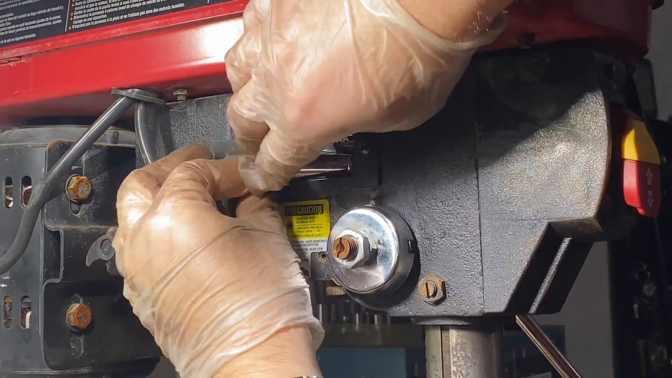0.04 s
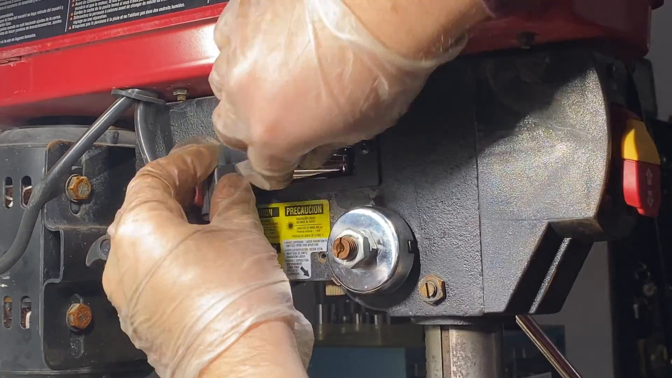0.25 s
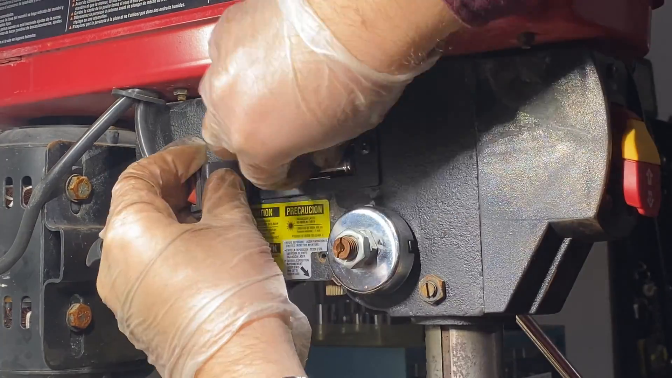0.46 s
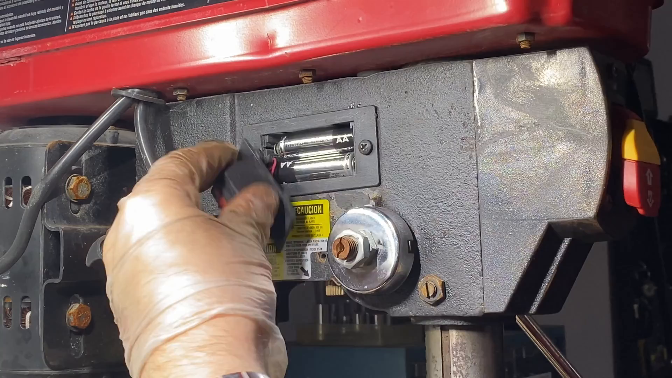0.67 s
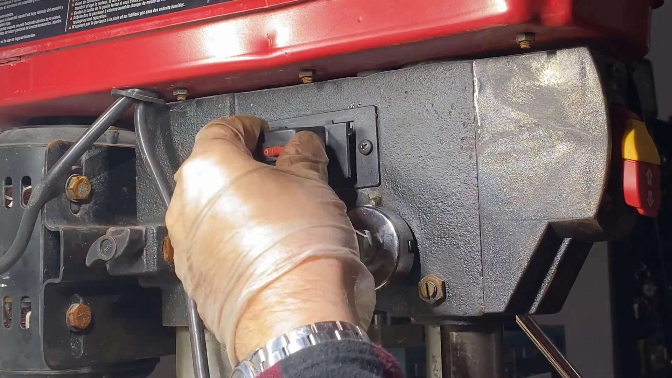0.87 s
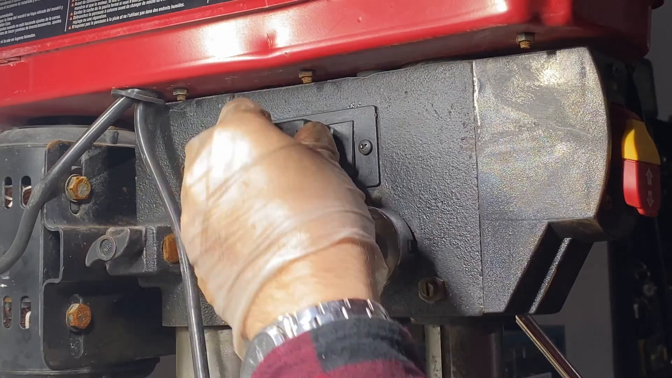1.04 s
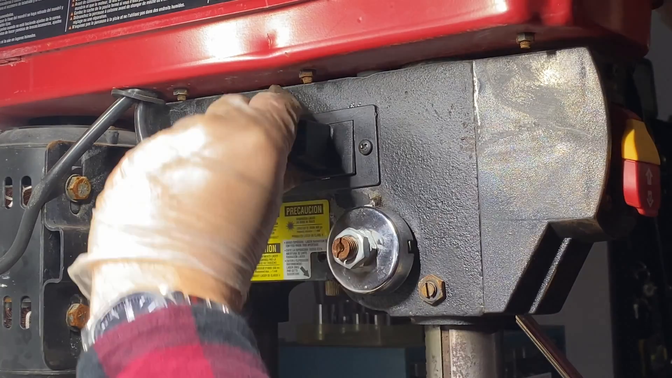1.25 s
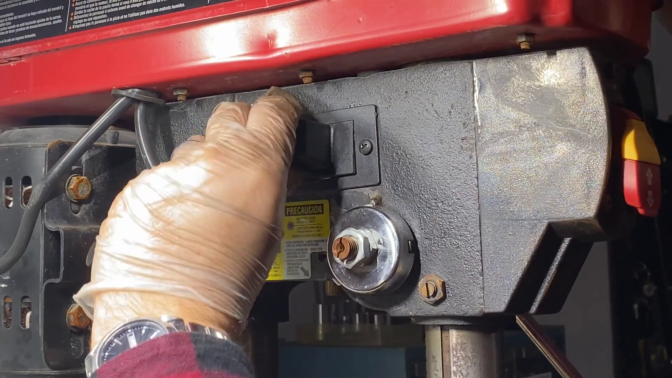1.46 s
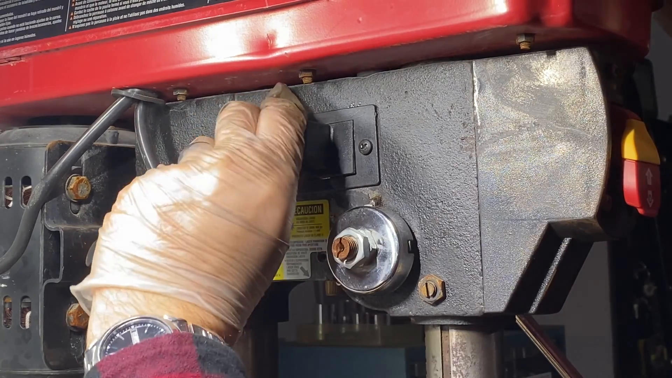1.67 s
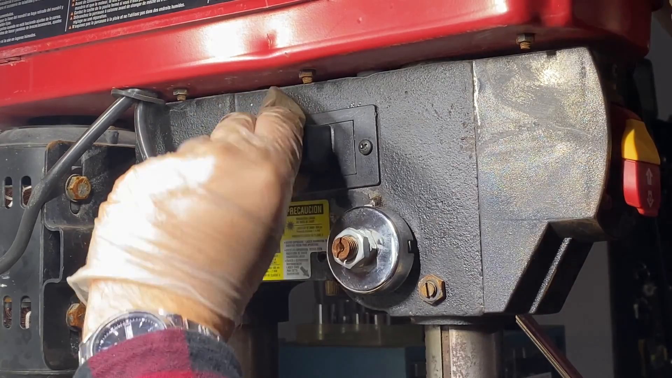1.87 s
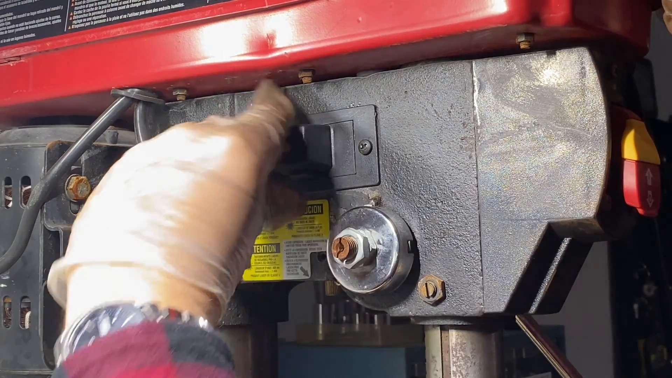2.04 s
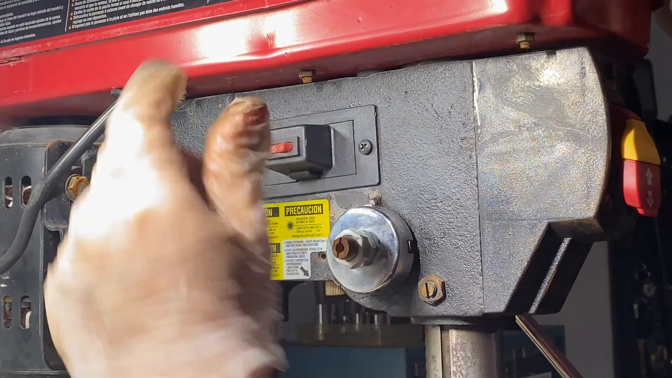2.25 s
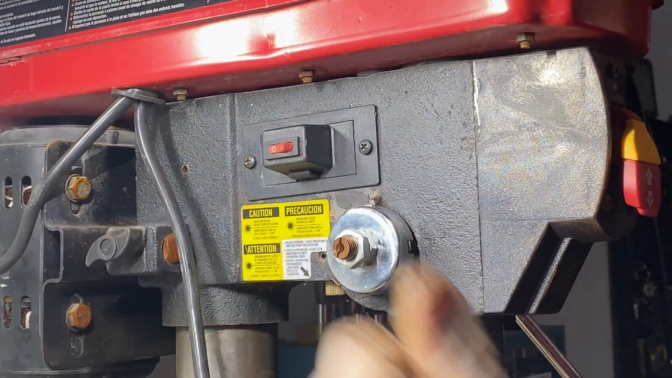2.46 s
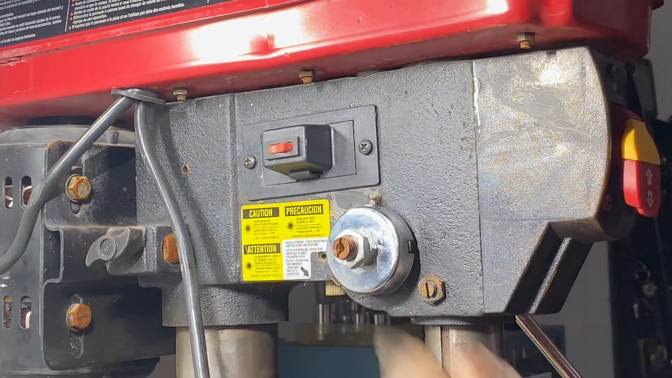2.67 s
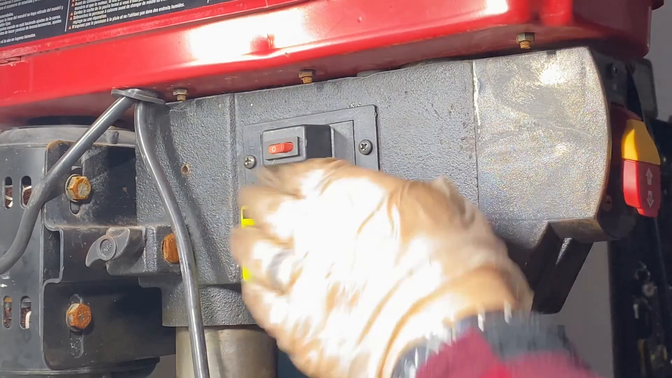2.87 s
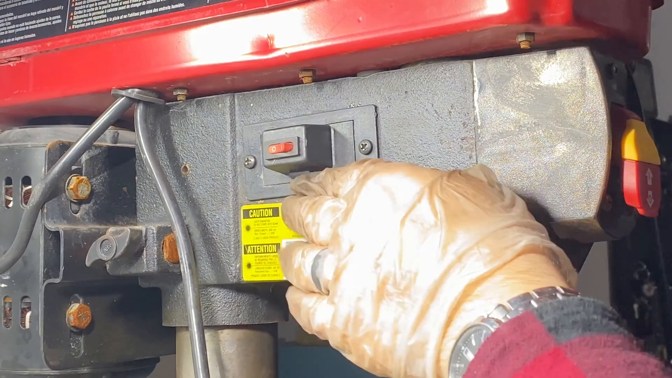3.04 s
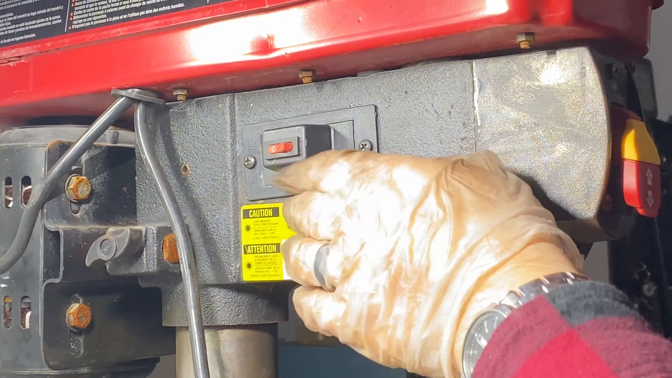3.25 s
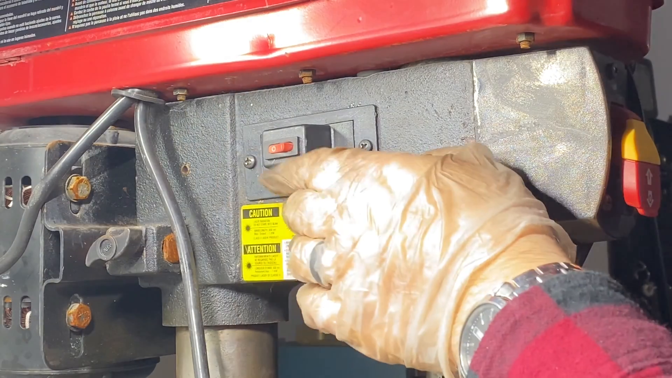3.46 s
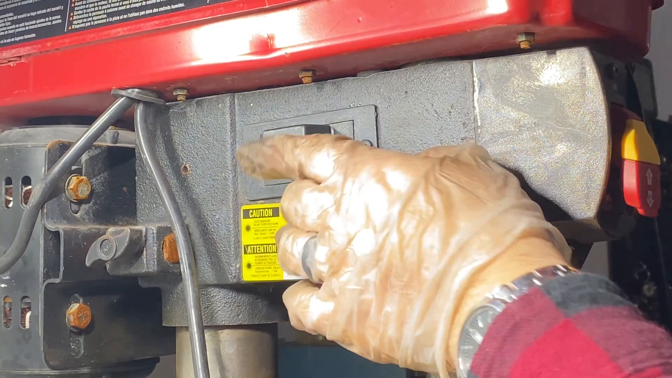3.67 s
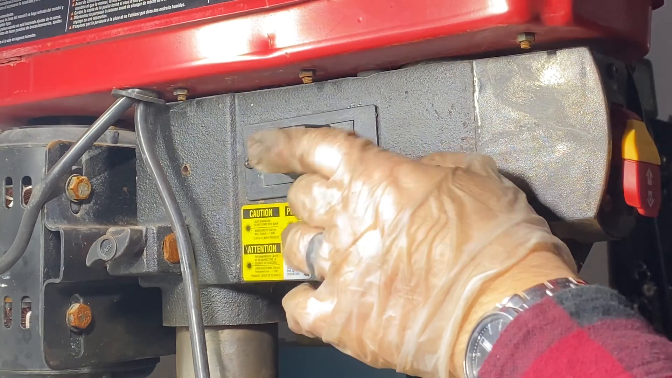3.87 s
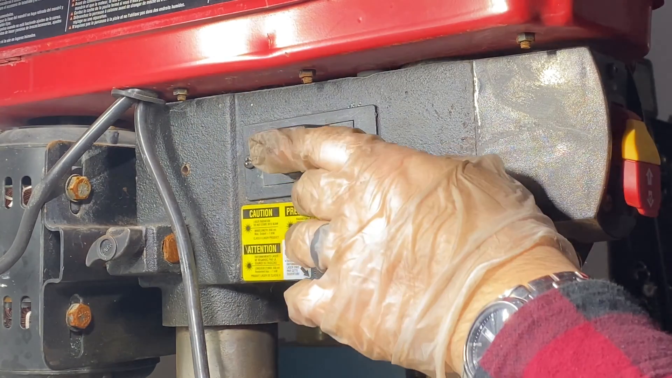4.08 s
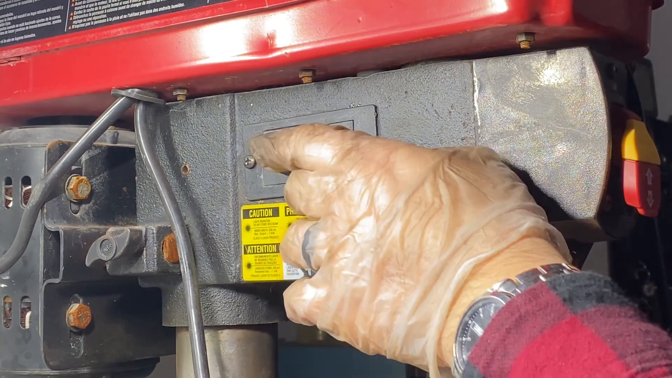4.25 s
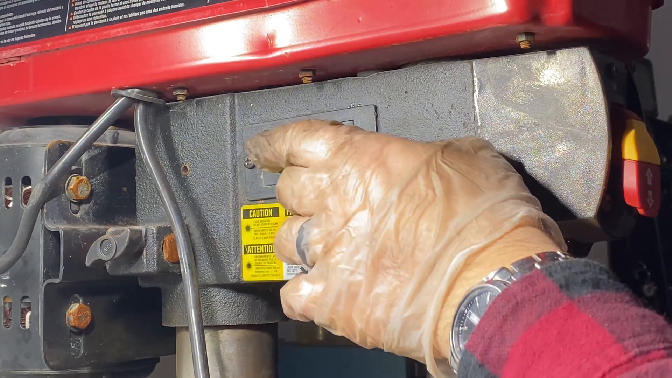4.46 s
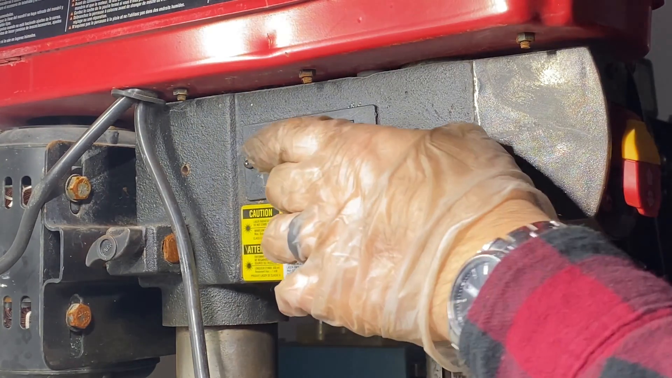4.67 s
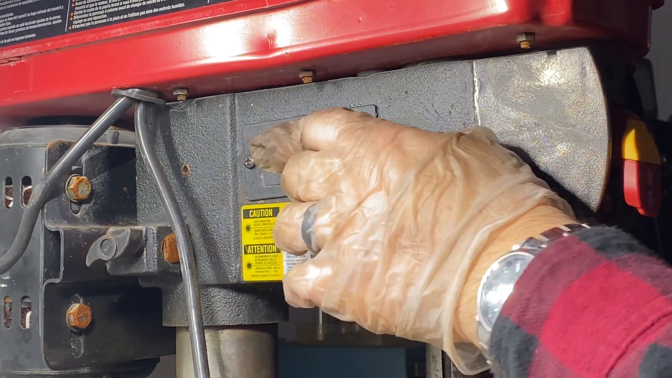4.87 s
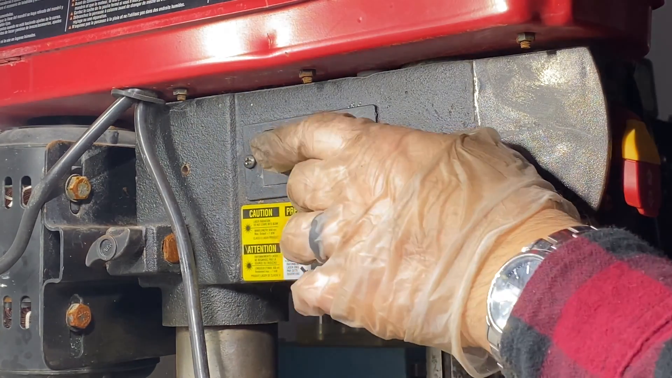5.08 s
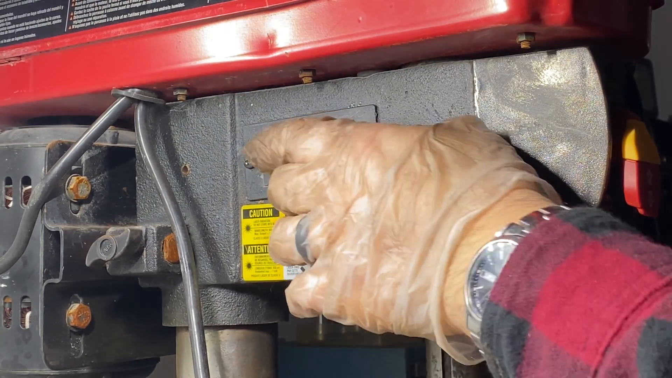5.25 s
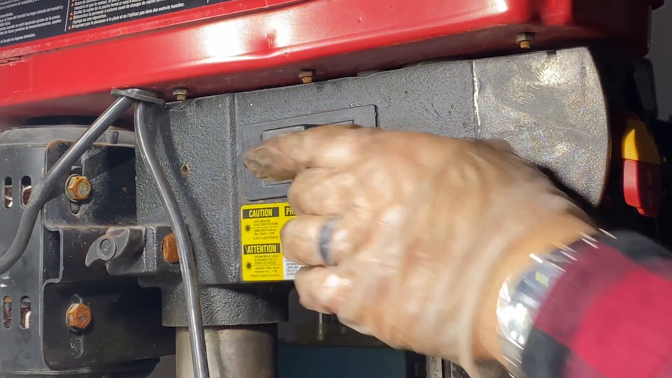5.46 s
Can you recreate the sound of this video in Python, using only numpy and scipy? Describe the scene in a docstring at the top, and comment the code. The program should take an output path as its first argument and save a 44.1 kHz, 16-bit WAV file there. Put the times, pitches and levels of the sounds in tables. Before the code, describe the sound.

Close plastic knocks and one hard snap as a cover closes on a machine, followed by glove crinkles and two crisp switch clicks.

```python
"""Gloved hands, close to two microphone ports, seat batteries in a plastic bay, snap its cover and work a switch.
Each knock or snap is a contact with brief chatter that rings the plastic or switch, and the cast iron behind.
Scrapes rub noise into the bay's modes, the cover settles with falling thunks and the thin gloves crinkle in grains.
Farther off, the workshop answers with decaying noise and rumbles faintly, with hiss, whistling bands and a whine."""
import sys
import numpy as np
from scipy import signal
from scipy.fft import rfft, irfft, next_fast_len
from scipy.io import wavfile

SR = 44100
rng = np.random.default_rng(int(sys.argv[2]) if len(sys.argv) > 2 else 0)


def transcribe(u):
    """Save the signal u as a 16-bit wav file named by the first command-line argument.

    u: samples, shape (n,) or (channels, n), limited to [-1, 1]; the rate is SR.
    q: integer samples, one column per channel.
    """
    v = np.clip(np.atleast_2d(u).T, -1, 1)
    q = np.round(v * 32767).astype(np.int16)
    wavfile.write(sys.argv[1], SR, q)


N = 243383

# Workshop rumble and air. Each row: frequency in Hz, relative density in dB per Hz.
AIR_COLOUR = [(12, -59), (20, -40.5), (45, -3.5), (86, 3.5), (142, -16.5), (241, -10.5), (319, -36.5),
              (377, -27.5), (949, -38.5), (1710, -40), (2080, -61.5), (2820, -64), (16000, -82)]
# Level of that air. Each row: time in seconds, level in dB.
AIR_LEVEL = [(0, -53.5), (1.7, -50.5), (2.1, -53), (2.95, -50.5), (3.4, -52.5), (4.75, -50.5),
             (5.52, -50.5)]
# Left-right likeness of the air. Each row: frequency in Hz, likeness from 0 to 1.
AIR_LIKENESS = [(30, 0.96), (100, 0.96), (300, 0.54), (1000, 0.43), (3000, 1), (10000, 0.83)]
# Faint whistling bands in the air. Each row: centre in Hz, width in Hz, level in dB.
WHISTLES = [(1920, 590, -90), (2750, 200, -87.5)]
# Decay of the walls' answer. Each row: frequency in Hz, time to fall 60 dB in seconds.
WALL_DECAY = [(200, 1), (530, 0.87), (1390, 0.48), (3680, 0.57), (9700, 0.43)]
# Left-right likeness of the room's answer. Each row: frequency in Hz, likeness from 0 to 1.
WALL_LIKENESS = [(250, 0.94), (640, 0.5), (1400, 0.22), (3000, 0.97), (7000, 0.77)]
# Hands and sleeves stirring close by. Each row: time in seconds, level in dB.
STIRRING = [(0, -90), (.62, -89.5), (.8, -77), (1.45, -75), (1.91, -70.5), (2.1, -77), (2.7, -75),
            (3.17, -82.5), (3.4, -77), (3.98, -87), (4.9, -89.5), (5.4, -78), (5.52, -87)]
# Colour of the glove film. Each row: frequency in Hz, relative density in dB per Hz.
FILM_COLOUR = [(410, -57.5), (700, -2), (2080, -5), (2300, -1), (2730, -2), (7200, -9), (8650, -8.5),
               (10700, -17), (13500, -8.5), (16000, -16)]
# Glove brushing and crinkling.
# Each row: peak time in seconds, level in dB, rise in seconds, fall in seconds, treble over body in dB.
GLOVE_BRUSHES = [(.81, -76, .0092, 0.0059, 0), (1.102, -62, 0.026, 0.019, 2.5), (1.28, -64.5, .02, .02, 6),
                 (2.032, -69, 0.022, .01, -2), (2.129, -55.5, 0.034, 0.0063, 4),
                 (2.281, -69, 0.044, 0.094, 17), (2.41, -67, 0.022, 0.03, 9),
                 (2.49, -74, 0.032, 0.014, -13), (2.67, -67, 0.045, 0.052, 27),
                 (2.776, -68.5, 0.0073, .005, 20), (2.936, -55, 0.0077, 0.016, -0.5),
                 (3.13, -60.5, 0.012, .005, 1), (3.263, -57, 0.0098, .03, -0.5),
                 (3.378, -52.5, 0.01, 0.0035, -0.5), (3.46, -65.5, .017, 0.031, -3),
                 (3.511, -56.5, .01, 0.017, 6), (3.562, -60.5, 0.00084, .0063, 1),
                 (3.713, -68, 0.014, 0.015, -5.5), (4.30, -79, .012, .03, -7.5),
                 (4.869, -59.5, .006, 0.019, -2.5), (5.09, -69, 0.0051, 0.0063, -2),
                 (5.401, -71.5, .0036, .03, 10), (5.451, -70.5, .018, 0.023, 12)]
# Fingers and batteries scraping in the bay.
# Each row: peak time in seconds, level in dB, rise in seconds, fall in seconds.
BAY_SCRAPES = [(0.446, -60, 0.0084, 0.016), (.555, -79, 0.0075, .02), (0.601, -62.5, 0.013, 0.035),
               (.64, -64.5, .01, 0.061), (1.475, -60, 0.0059, 0.0074)]
# The cover settling after a knock.
# Each row: start in seconds, level in dB, start pitch in Hz, end pitch in Hz, length in seconds.
COVER_THUNKS = [(0.691, -54, 700, 422, 0.0453), (1.589, -47.5, 851, 372.5, 0.05)]
# Modes of the cover and bay. Each row: frequency in Hz, relative level in dB, time to fall 60 dB in seconds.
COVER_MODES = [(400.3, -27, 0.15), (444, -10.5, 0.0052), (735, -1.5, 0.011), (1100, -4.5, 0.0074),
               (1432, 1, 0.008), (2187, 0, 0.011), (2730, -1.5, 0.0055), (3550, -0.5, 0.0068),
               (4240, -2, 0.0035), (7100, 4, 0.0013)]
# Modes of the switch rocker and spring. Each row: frequency in Hz, relative level in dB, 60 dB fall in seconds.
SWITCH_MODES = [(700, -5, 0.0073), (1080, -7, 0.012), (1350, -3.5, 0.0076), (1976, 0.5, 0.012),
                (2887, 7.5, 0.013), (4200, -2.5, 0.0046), (6820, -1, 0.049), (10230, -17, 0.0028)]
# Modes of the iron casting and sheet hood. Each row: frequency in Hz, relative level in dB, 60 dB fall in seconds.
CASTING_MODES = [(138, -3.5, 0.045), (182, -5, 0.11), (256.3, -7.5, 0.36), (487, -3.5, 0.18),
                 (608, -11.5, 0.15), (695.6, 0.5, 0.13), (1347, -25, 0.3), (2050, -30, 0.25)]
# Knocks on the plastic cover. Each row: start in seconds, level in dB, contact time constant in ms,
# low modes' boost in dB, crack over ringing in dB.
COVER_KNOCKS = [(.188, -70, 0.033, -15, -25), (.445, -53, 0.13, 7, -23), (.549, -47.5, 0.52, 10, -32),
                (.597, -50, 0.31, 14, -32), (.625, -51.5, .033, 3, -8.5), (.680, -24, 0.054, -0.5, -30),
                (1.055, -36, 0.084, -22, -29), (1.260, -45.5, 0.23, -8, -22),
                (1.482, -32.5, 0.068, 3.5, -7.5), (1.582, -24.5, 0.054, 5.5, -30),
                (1.691, -22.5, 0.036, 1.5, -24), (1.7277, -19, 0.061, -10.5, -18),
                (1.7308, -13.5, 0.056, 0, 0), (3.801, -56.5, 0.13, -8.5, -31)]
# Switch snaps. Each row: start in seconds, level in dB, contact time constant in ms,
# low modes' boost in dB, crack over ringing in dB.
SWITCH_SNAPS = [(1.969, -47.5, 0.0058, 7, 8), (3.897, -46, .019, 9, 8), (4.5545, -27.5, 0.055, 1.5, 6),
                (5.212, -27, 0.077, 1, 7.5)]
# What a firm blow passes on: casting dB, casting dB per dB above firm, room dB, room dB per dB below firm (signed).
COVER_PASSING = (-32, 1.4958, 1.5, -0.14)
SWITCH_PASSING = (-22, .45, 8, -0.22)
# Phase between the two microphone ports. Each row: frequency in Hz, radians by which left leads.
PORT_PHASE = [(0, 0), (1030, 0.5), (1640, 0.0), (4820, 0.7), (6120, -0.6), (7840, 0.1), (8100, 2.0),
              (8700, 2.2), (10200, 0.5), (11600, -0.5), (13300, -3.2), (14200, -3.4), (15200, -6.1),
              (16300, -6.7)]
EDGES = 20 * 2 ** np.arange(0, 10.1, .5)   # half-octave band edges in Hz

WHINE_HZ, WHINE_DB = 1700, -88.5   # faint tone; its level wanders around this rms
ROOM_DB, FIRST_ECHO_S = -8.5, 0.0023   # the answer fades in over about this time
NEAR_DB, NEAR_T60_S = 13, 0.063   # quick echoes off the machine and bench, starting over the walls' level
FILM_SPLIT_HZ = 6400   # between the body and the treble of a brush
SCRAPE_CUT_HZ, CRACK_CUT_HZ = 770, 9900   # low-pass corners
FAR_CYCLES = 12   # longest ring, in cycles to fall 60 dB, that carries to the walls
LOW_MODES_HZ = 1200   # modes under this are too slow to follow the chatter
CHATTER_S = .00105   # the rattle's time to its strongest point
FIRM_DB = -25   # level of a firm blow
CUTOFF_HZ = 16700   # the top is 70 dB down from here


def amp(db):
    """Decibels to amplitude ratio."""
    return 10 ** (np.asarray(db) / 20)


def rms_one(x):
    """Scale to an rms of 1."""
    return x / np.sqrt(np.mean(x ** 2) + 1e-20)


def in_time(rows):
    """Straight lines between (seconds, value) points."""
    return np.interp(np.arange(N) / SR, *np.transpose(rows))


def at_hz(points, hz):
    """Lines between (Hz, value) points, straight over log frequency."""
    point_hz, values = np.transpose(points)
    return np.interp(np.log(hz), np.log(point_hz), values)


def drift(rate_hz):
    """Slow chance of spread 1: noise through two equal poles with their corner at rate_hz."""
    step = 40   # samples between slow values
    r = np.exp(-2 * np.pi * step * rate_hz / SR)
    white = rng.standard_normal(N // step + 2002)
    slow = signal.lfilter([1], [1, -2 * r, r * r], white)[2000:]   # drop the run-in
    return np.interp(np.arange(N) / step, np.arange(len(slow)), rms_one(slow))


def band_pass(x, low, high):
    """Keep what lies between two frequencies in Hz."""
    return signal.sosfilt(signal.butter(2, [low, high], "band", fs=SR, output="sos"), x)


def bands(white, likeness):
    """Half-octave bands of stereo noise, left and right as alike as the table says: yields centre Hz, pair."""
    for k, (low, high) in enumerate(zip(EDGES, EDGES[1:])):
        mid, side = band_pass(white[k % 2], low, high)   # neighbours use separate noise
        hz = np.sqrt(low * high)
        alike = np.clip(at_hz(likeness, hz), 0, 1)
        yield hz, np.sqrt(1 + alike) * mid + np.sqrt(1 - alike) * side * [[1], [-1]]


def swell(t, s, rise, fall):
    """A bell-shaped rise to the peak at s, then an exponential fall."""
    rising = np.exp(-((t - s) / rise) ** 2 / 2)
    falling = np.exp(np.minimum(s - t, 0) / fall)
    return np.where(t < s, rising, falling)


def ring(force, modes):
    """The force sets every mode ringing as a damped resonator; neighbours swing against each other."""
    out = 0
    for k, (hz, db, t60) in enumerate(modes):
        r, w = amp(-60 / (t60 * SR)), 2 * np.pi * hz / SR
        mode = signal.lfilter([0, np.sin(w)], [1, -2 * r * np.cos(w), r * r], force)
        out = out + (-1) ** k * amp(db) * mode
    return out


def workshop_air():
    """Low rumble thinning into hiss, every band wavering a little, with whistling bands and one faint tone."""
    white = rng.standard_normal((2, 2, N))
    air = sum(amp(at_hz(AIR_COLOUR, hz) + 2.7 * drift(1.5)) * pair for hz, pair in bands(white, AIR_LIKENESS))
    out = amp(in_time(AIR_LEVEL)) * rms_one(air)
    for hz, width, db in WHISTLES:
        narrow = signal.lfilter(*signal.iirpeak(hz, hz / width, fs=SR), rng.standard_normal(N))
        out += amp(db + 1.1 * drift(2)) * rms_one(narrow)
    whine = np.sin(2 * np.pi * WHINE_HZ * np.arange(N) / SR)
    return out + np.sqrt(2) * amp(WHINE_DB + 2.0 * drift(0.87)) * whine


def walls(sent):
    """The room's answer: noise that fades in with the first echo, then dies band by band."""
    size = int(.7 * SR)
    t = np.arange(size) / SR
    near = amp(NEAR_DB - 60 * t / NEAR_T60_S)
    white = rng.standard_normal((2, 2, size))
    answer = sum((amp(-60 * t / at_hz(WALL_DECAY, hz)) + near) * pair for hz, pair in bands(white, WALL_LIKENESS))
    answer = answer * (1 - np.exp(-(t / FIRST_ECHO_S) ** 2))
    answer = rms_one(answer) / np.sqrt(size)
    return amp(ROOM_DB) * signal.fftconvolve(sent[None], answer, axes=1)[:, :N]


def gloves():
    """Dense crinkle grains in the flickering colour of the film, swelling and fading with each brush."""
    loudness_db = 1.2 * np.minimum(rng.exponential(1, N), 5)   # a few grains stand out
    grains = rng.standard_normal((2, N)) * amp(loudness_db)
    film = 0
    for k, (low, high) in enumerate(zip(EDGES[9:], EDGES[10:])):
        colour_db = at_hz(FILM_COLOUR, np.sqrt(low * high)) + 2.8 * drift(25)
        film = film + amp(colour_db) * band_pass(grains[k % 2], low, high)
    # thin film has no lows
    film = signal.sosfilt(signal.butter(2, 1100, "high", fs=SR, output="sos"), rms_one(film))
    body = signal.lfilter(*signal.butter(1, FILM_SPLIT_HZ, fs=SR), film)
    treble = film - body
    out, t = amp(in_time(STIRRING)) * film, np.arange(N) / SR
    for s, db, rise, fall, treble_db in GLOVE_BRUSHES:
        lean = amp(-treble_db / 2) * body + amp(treble_db / 2) * treble
        out += amp(db) * swell(t, s, rise, fall) * lean
    return out


def scrapes():
    """Soft uneven slips rubbed into the modes of the bay."""
    slips = rng.standard_normal(N) * (rng.random(N) < 600 / SR)   # about 600 a second
    soft = signal.sosfilt(signal.butter(2, SCRAPE_CUT_HZ, fs=SR, output="sos"), slips + 1e-18)
    t = np.arange(N) / SR
    level = sum(amp(db) * swell(t, s, rise, fall) for s, db, rise, fall in BAY_SCRAPES)
    return rms_one(ring(soft, COVER_MODES)) * level


def cover_settling():
    """A rough tone that slides down as the bent cover relaxes."""
    out = np.zeros(N)
    for s, db, start_hz, end_hz, length in COVER_THUNKS:
        age = np.arange(round(length * SR)) / (length * SR)   # 0 to 1
        hz = start_hz * (end_hz / start_hz) ** np.sqrt(age)   # falls fastest at first
        turns = np.cumsum(hz) / SR
        span = slice(round(s * SR), round(s * SR) + len(age))
        rough = amp(db + 2.3 * drift(60)[span])
        out[span] += rough * np.sin(np.pi * age) * np.sin(2 * np.pi * turns)
    return out


def blows(rows, modes, passing):
    """Each blow is a contact with a few ms of chatter; returns the close sound and what goes out to the walls."""
    out, size = np.zeros((2, N)), SR // 2
    t = np.arange(size) / SR
    age = t / CHATTER_S
    blurred = [(hz, db, min(t60, FAR_CYCLES / hz)) for hz, db, t60 in modes]
    edge = signal.butter(1, CRACK_CUT_HZ, fs=SR)
    main = 1. * (np.arange(size) == round(.6 * CHATTER_S * SR))   # one impulse just after the start
    for s, db, contact_ms, low_db, crack_db in rows:
        casting_db = passing[0] + passing[1] * max(db - FIRM_DB, 0)
        room_db = passing[2] + passing[3] * min(db - FIRM_DB, 0)
        luck = rng.standard_normal((2, size))
        rattle = luck[0] * (luck[1] > .6) * 0.34 * age * np.exp(-age)   # builds, then dies
        # a longer contact softens the push
        soft = np.exp(-1000 / SR / max(contact_ms, .005))
        pushes = [main + 1e-18, 0.35 * main + rattle + 1e-18]
        thrust, shaken = signal.lfilter([1], [1, -2 * soft, soft * soft], pushes)
        at = round(s * SR)
        # from afar the chatter and the fine ringing blur into one even blow
        close = (0, 0.19 * main + rattle, shaken, modes, db)
        far = (1, main, thrust, blurred, db + room_db)
        for channel, force, push, rings, out_db in (close, far):
            crack = signal.lfilter(*edge, np.diff(force, prepend=0))
            low = [m for m in rings if m[0] < LOW_MODES_HZ]
            high = [m for m in rings if m[0] >= LOW_MODES_HZ]
            scale = np.sqrt(np.sum(push ** 2) / np.sum(thrust ** 2))   # equal energy for the low modes' push
            ringing = ring(push, high) + amp(low_db) * scale * ring(thrust, low)
            sound = ringing / np.abs(ringing).max() + amp(crack_db) * crack / np.abs(crack).max()
            out[channel, at:at + size] += amp(out_db) * sound[:N - at]
        # the iron rings in the close sound only
        iron = ring(thrust / thrust.sum(), CASTING_MODES)
        out[0, at:at + size] += amp(db + casting_db) * iron[:N - at]
    return out


def switch_snaps():
    """Blows that ring the rocker and spring, with the iron behind."""
    return blows(SWITCH_SNAPS, SWITCH_MODES, SWITCH_PASSING)


def cover_knocks():
    """Blows that ring the plastic cover and bay, with the iron behind."""
    return blows(COVER_KNOCKS, COVER_MODES, COVER_PASSING)


def scene():
    """Close sounds, their room answer and the workshop air."""
    # the soft sounds go alike to the close sound and to the walls
    close, sent = cover_knocks() + switch_snaps() + gloves() + scrapes() + cover_settling()
    return close + walls(sent) + workshop_air()


def record(dry):
    """The two microphone ports turn the phase differently with pitch; the top is cut."""
    size = next_fast_len(N + 2048)
    lead = np.interp(np.arange(size // 2 + 1) * SR / size, *np.transpose(PORT_PHASE))
    turn = np.exp(.5j * lead * np.array([[1], [-1]]))   # half the lead to each side
    ports = irfft(rfft(dry, size) * turn, size)[:, :N]
    return signal.sosfilt(signal.cheby2(12, 70, CUTOFF_HZ, fs=SR, output="sos"), ports)


dry = scene()
out = record(dry)
transcribe(out)
```